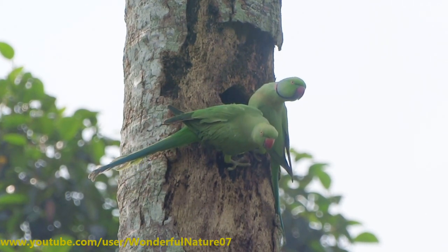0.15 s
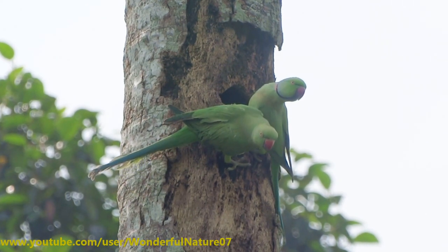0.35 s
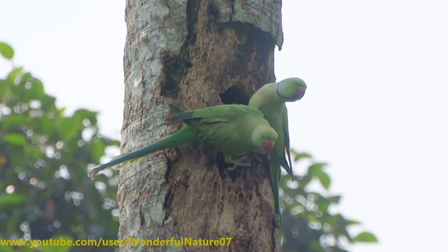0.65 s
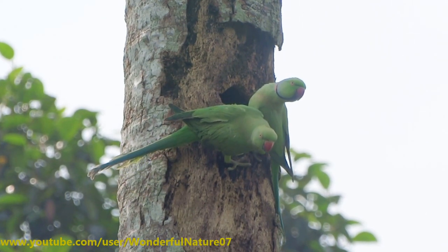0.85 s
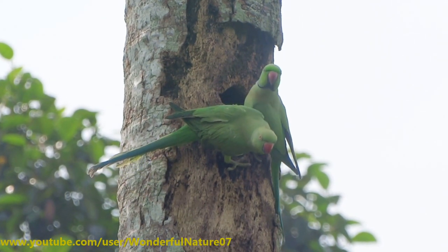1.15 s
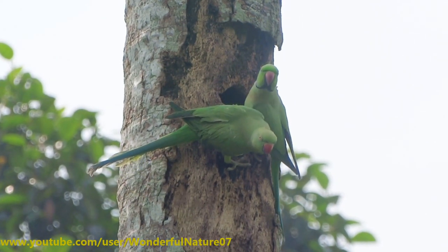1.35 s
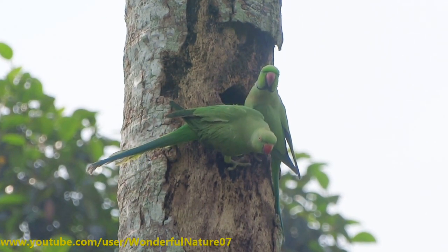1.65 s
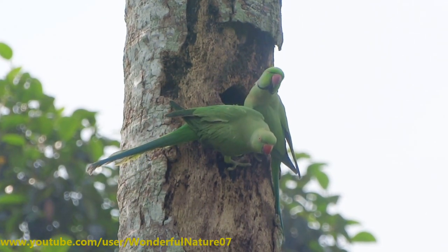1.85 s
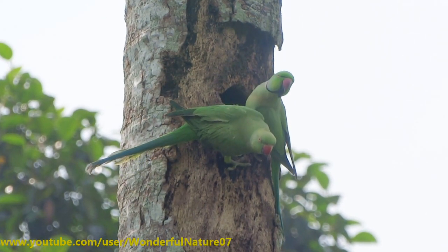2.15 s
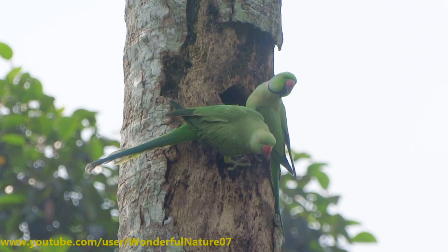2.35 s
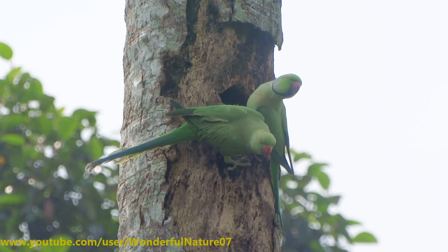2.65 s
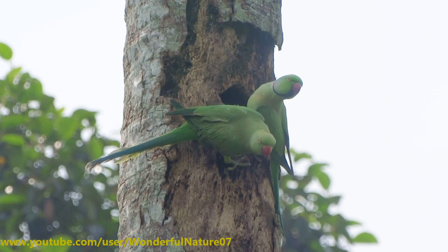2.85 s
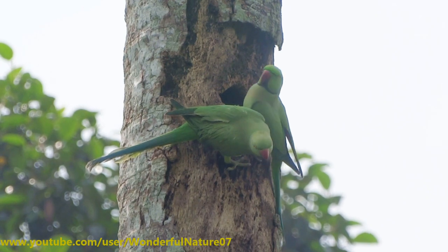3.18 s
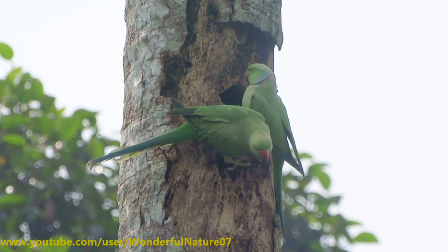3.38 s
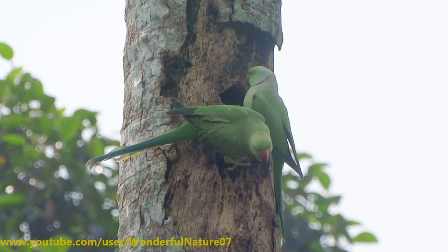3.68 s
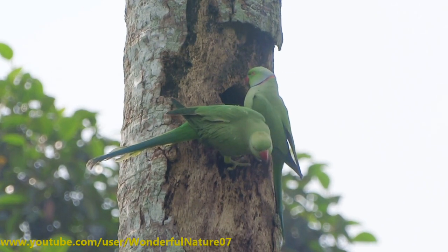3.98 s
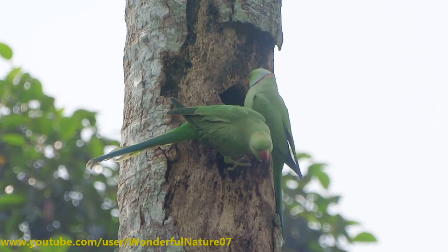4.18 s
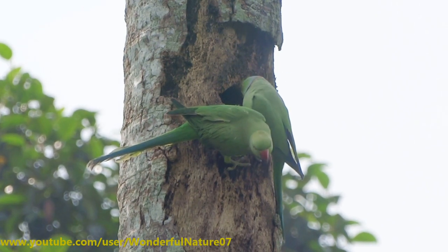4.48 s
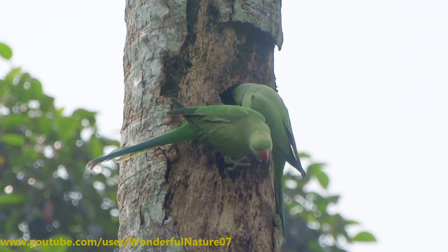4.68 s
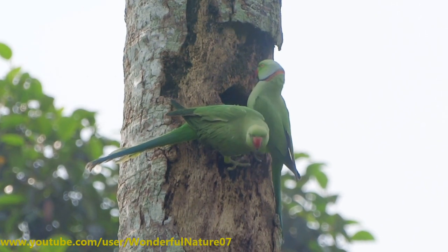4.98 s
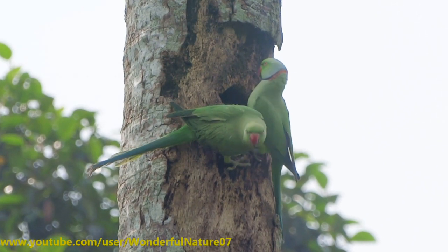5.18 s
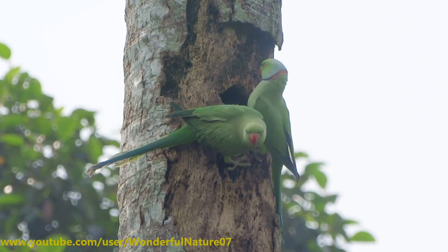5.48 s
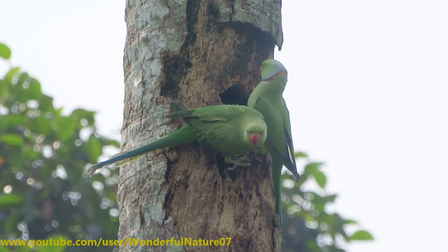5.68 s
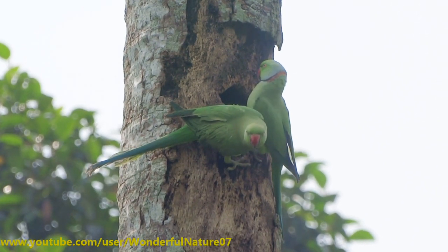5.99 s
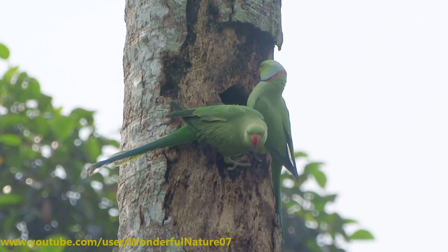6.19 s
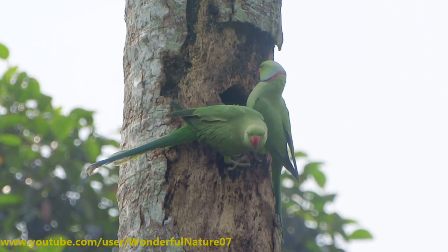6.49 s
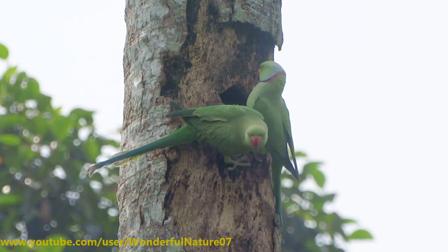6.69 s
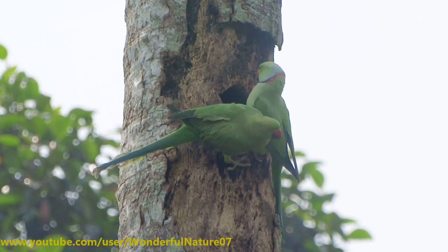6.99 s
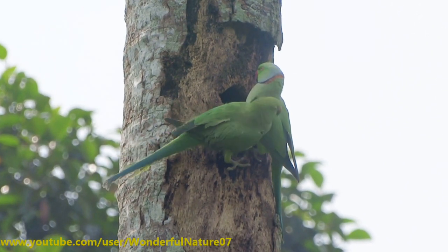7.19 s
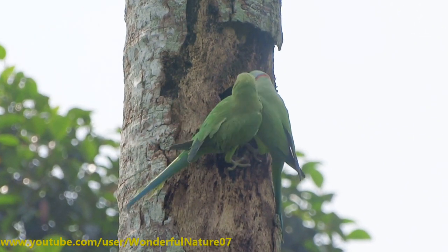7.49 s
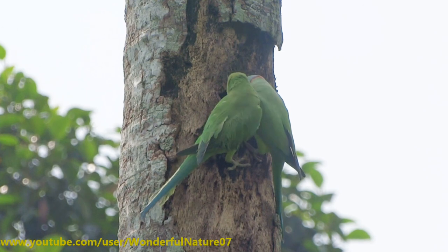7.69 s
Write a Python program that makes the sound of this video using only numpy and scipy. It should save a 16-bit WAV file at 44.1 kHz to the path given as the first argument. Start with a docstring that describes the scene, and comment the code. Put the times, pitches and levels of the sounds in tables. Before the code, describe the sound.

Outdoor woodland birdsong heard from a fixed spot. Distant hollow trills come first, then one louder, closer bird repeats a fast descending roll five times, alternating with blurred answers. Sharp high chips, sliding whistles and brief buzzy falling calls come between. Quiet airy hiss, shimmering high insects, a barely audible dove purr and a remote slow engine lie beneath. The final second gets busier with clear whistles.

```python
"""A humid forest edge, heard in stereo: a barbet close by rolls five-note trills, nearly dry; others answer
from farther off, blurred by echo. Small birds chip and whistle among the trunks: pitch curves drive sines, and
each call gets a fresh noise tail. A dove purrs and a slow engine thumps in the distance: clicks ring resonances.
Cicadas and crickets drone as pulsed narrow bands of noise, over shaped noise for the murmur and the leaves."""
import sys
import numpy as np
from scipy import signal
from scipy.fft import rfft, irfft, next_fast_len
from scipy.io import wavfile
from scipy.ndimage import uniform_filter1d, map_coordinates

SR = 44100
rng = np.random.default_rng(int(sys.argv[2]) if len(sys.argv) > 2 else 0)


def store_pcm(level_fs):
    """Save levels as 16-bit WAV."""
    pcm = np.round(np.clip(level_fs, -1, 1) * 32767).astype(np.int16)
    wavfile.write(sys.argv[1], SR, np.atleast_2d(pcm).T)


N = 345744

# one hooked barbet note, before the trill reshapes it: time_s, pitch_hz, level_db
HOOKED_NOTE = [(-.008, 1276, -14), (-.003, 1286, -9.5), (.002, 1331, -1), (.0065, 1255, -3),
               (0.0104, 1175, 0.24), (.017, 1105, -8), (.024, 1096, -9), (0.03, 1170, -19)]


def amp(db):
    """Gain of a level in dB."""
    return 10 ** (np.asarray(db) / 20)


def unit(x):
    """x at rms 1."""
    return x / np.sqrt(np.mean(x ** 2) + 1e-20)


def along(points, hz):
    """Reads (Hz, value) points on a log frequency axis."""
    f, v = np.transpose(points)
    return np.interp(np.log(hz + 1), np.log(f + 1), v)


def curves(rows, start=0, size=N):
    """One value per sample for each column after the time."""
    s, *cols = np.transpose(rows)
    t = start + np.arange(size) / SR
    return [np.interp(t, s, c) for c in cols]


def wobble(rate, size=N):
    """A smooth random curve, rate knots a second."""
    knots = rng.standard_normal(int(size * rate / SR) + 4)
    return map_coordinates(knots, [np.arange(size) * rate / SR])


def filtered(x, response):
    """x times a complex response of frequency."""
    m = next_fast_len(N + SR // 2)
    return irfft(rfft(x, m) * response(np.fft.rfftfreq(m, 1 / SR)), m)[..., :N]


def peak(f, hz, width):
    """Response of a causal resonance."""
    return 1j * f * width / (hz * hz - f * f + 1j * f * width)


def pair(a, b, alike):
    """Left and right from two unrelated signals with the given likeness."""
    turn = np.arccos(np.clip(alike, -1, 1)) / 2
    middle, side = np.cos(turn) * a, np.sin(turn) * b
    return np.array([middle + side, middle - side])


def beats(rate, scatter_db):
    """One click each time the running rate completes a cycle."""
    at = np.flatnonzero(np.diff(np.floor(np.cumsum(rate) / SR)))
    clicks = np.zeros(N)
    clicks[at] = amp(scatter_db * wobble(30)[at])
    return clicks


def bouts(rows, fade):
    """Gain that opens for each (start_s, length_s, level_db), fading in and out."""
    t = np.arange(N) / SR
    gain = 0
    for s, length, db in rows:
        to_edge = np.minimum(t - s, s + length - t)
        gain = gain + amp(db) * np.clip(to_edge / fade + .5, 0, 1)
    return gain


def dove():
    """A purr: about 28 puffs a second ring a hollow throat."""
    # purrs: start_s, length_s, level_db
    purrs = [(-.1, 0.68, -60), (2.9, 1.55, -60), (5.2, 1.14, -61), (7.1, 1, -63)]
    puffs = beats(28.0 * (1 + .03 * wobble(7.3)), scatter_db=2.0)
    purr = filtered(puffs, lambda f: peak(f, 456.0, 69.5) ** 2)
    return bouts(purrs, fade=0.11) * amp(0.85 * wobble(3.97)) * unit(purr)


def hiss(spectrum, patchy_db):
    """Stereo noise of rms 1 with faint patches in time and pitch, shaped by a spectrum."""
    # left-right likeness of the air: freq_hz, likeness
    air_likeness = [(60, 0.97), (150, 0.95), (380, 0.58), (950, 0.57), (2380, 0.76), (5980, 1), (15000, 1)]
    z = signal.stft(rng.standard_normal((2, N)), nperseg=512)[2]
    patches = uniform_filter1d(rng.standard_normal(z.shape[1:]), size=6, axis=0)
    patches = uniform_filter1d(patches, size=14, axis=1)
    hz = np.fft.rfftfreq(512, 1 / SR)[:, None]
    patchy = pair(*z, along(air_likeness, hz)) * amp(patchy_db * unit(patches))
    stereo = signal.istft(patchy, nperseg=512)[1][:, :N]
    return unit(filtered(stereo, lambda f: amp(along(spectrum, f))))


def air():
    """A low murmur from afar and the hiss of leaves, each noise under its own slow level curve."""
    # spectrum of the forest's murmur: freq_hz, relative_db
    murmur_spectrum = [(15, -59), (25, -9), (157, -7), (201, -6), (261, -4.5), (462, -7), (539, -3.5),
                       (1000, -9), (1300, -63), (2200, -120)]
    # spectrum of the leaves: freq_hz, relative_db
    leaf_spectrum = [(700, -43), (1100, 3.5), (1700, -1.5), (2400, -7.5), (4200, -4), (5000, -5.5),
                     (7200, -2), (9200, -5.5), (10000, -11.5), (12700, -13), (13600, -21.5), (15800, -17)]
    # the breeze: time_s, murmur_db, leaves_db
    breeze = [(0, -61, -55), (1.0, -60.5, -56), (1.6, -60.5, -53), (4, -56.5, -53.5), (5.2, -57.5, -52),
              (6.4, -58, -52), (7.84, -59.5, -50.5)]
    murmur_db, leaves_db = curves(breeze)
    murmur = amp(murmur_db) * hiss(murmur_spectrum, patchy_db=2.0)
    leaves = amp(leaves_db + 1.64 * wobble(8)) * hiss(leaf_spectrum, patchy_db=2.5)
    return murmur + leaves


def engine():
    """A single slow cylinder thumps through its exhaust; distance narrows each resonance."""
    # level of the thumping: time_s, level_db
    thump_level = [(0.0, -66), (0.13, -56), (0.24, -65.5), (3.25, -63), (3.41, -57), (4.5, -68),
                   (4.56, -60.5), (7.73, -63.5), (7.84, -65)]
    # exhaust resonances, alternating in sign: freq_hz, width_hz, gain_db
    exhaust = [(93, 37, -2.5), (150.4, 30, -1.5)]

    def pipe(f):
        return sum((-1) ** k * amp(g) * peak(f, hz, w) ** 2 for k, (hz, w, g) in enumerate(exhaust))

    db, = curves(thump_level)
    firings = beats(17.5 * (1 + 0.0292 * wobble(2.8)), scatter_db=2.5)  # about 17.5 a second
    return amp(db) * unit(filtered(firings, pipe))


def choir(hz, width, rate, depth):
    """A narrow band of noise whose centre drifts, in puffs at its buzz rate."""
    buzz_phase = 2 * np.pi * np.cumsum(rate * (1 + .006 * wobble(3))) / SR
    buzz = np.exp(2 * depth * np.cos(buzz_phase))
    slow = filtered(rng.standard_normal((4, N)), lambda f: 1 / (1 + (2 * f / width) ** 2))
    turn = 2 * np.pi * np.cumsum(hz * (1 + .003 * wobble(1.2))) / SR
    band = slow[:2] * np.cos(turn) + slow[2:] * np.sin(turn)  # slow noise moved up to the centre pitch
    return amp(.8 * wobble(6)) * unit(pair(*band, .992) * buzz)


def cicadas():
    """Two choirs of pulsed noise bands swell, each on its own level curve."""
    # swells: time_s, low_choir_db, high_choir_db
    swells = [(0.0, -57.5, -59.5), (0.7, -51, -51), (0.89, -60, -55), (1.22, -55, -59), (2.27, -56.5, -58),
              (2.9, -52.5, -51.5), (3.45, -53.5, -55.5), (4.13, -58.5, -56), (4.76, -54.5, -56),
              (5.28, -50, -52), (5.76, -57, -55), (6.38, -53.5, -53), (7.03, -51.5, -59.5),
              (7.38, -53.5, -50.5), (7.84, -56, -55)]
    # bands, the first being the low choir: centre_hz, width_hz, pulses_per_s, pulse_depth, db_over_swell
    bands = [(7930, 460, 45, 0, 0), (8344, 160, 160, 0.2, -2), (8630, 310, 78, 0.43, -7),
             (11930, 470, 70, 0.3, -15)]
    low_db, high_db = curves(swells)
    drone = 0
    for k, (*voice, db) in enumerate(bands):
        swell_db = high_db if k else low_db
        drone = drone + amp(swell_db + db + 1.8 * wobble(2.2)) * choir(*voice)
    return drone


def crickets():
    """Pulsed noise bands open in regular bouts."""
    # centre_hz, width_hz, pulses_per_s, pulse_depth, level_db, first_bout_s, period_s, bout_s
    singers = [(10730, 370, 55, 0.24, -67.5, -0.51, 1.35, 0.66),
               (11230, 140, 70, .1, -68, 0.15, 1.24, 0.48)]
    song = 0
    for *voice, db, first, period, bout in singers:
        rows = [(s, bout, db) for s in np.arange(first, N / SR, period)]
        song = song + bouts(rows, fade=.12) * choir(*voice)
    return song


def add_call(out, s, call, echo_db, pan_db=0):
    """Lays a call into out with the answer of the trunks, a new decaying noise tail for each call."""
    # decay of the echoes: freq_hz, t60_s
    forest_decay = [(500, 1.7), (1200, 1.21), (3000, .7), (7000, 0.56), (14000, 0.37)]
    # left-right likeness of the echoes: freq_hz, likeness
    echo_likeness = [(500, 0.46), (1200, 0.92), (3000, 0.88), (6000, 1)]
    hz, t, z = signal.stft(rng.standard_normal((2, SR)), SR, nperseg=256)
    z = pair(*z, along(echo_likeness, hz)[:, None]) * amp(-60 * t / along(forest_decay, hz)[:, None])
    z /= np.sqrt(np.sum(abs(z[0]) ** 2, axis=1, keepdims=True))  # equal energy at every pitch
    tail = signal.istft(z, SR, nperseg=256)[1]
    path = amp(echo_db) * tail / np.linalg.norm(tail[0])
    path[:, 0] = 1  # the direct sound
    pan = amp([[pan_db / 2], [-pan_db / 2]])  # pan_db is left over right
    heard = signal.fftconvolve(call[None], path, axes=1) * pan
    spot = out[:, round(s * SR):][:, :heard.shape[1]]
    spot += heard[:, :spot.shape[1]]


def sung(hz, db):
    """A sine on a pitch curve."""
    return amp(db) * np.sin(2 * np.pi * np.cumsum(hz) / SR)


def whistle(length, hz0, hz1, bend, warble_hz):
    """A tone that slides toward its end pitch, shaken by an uneven warble."""
    u = np.arange(round(length * SR)) / (length * SR)
    glide = hz0 + (hz1 - hz0) * np.expm1(-bend * u) / np.expm1(-bend)
    warble = warble_hz * wobble(120, size=len(u))
    return np.sin(np.pi * u) ** .45 * sung(glide + warble, 0)


def gliding_whistles(out):
    """Glides among the trunks, some alone, some the opening or one half of a longer call."""
    # start_s, length_s, from_hz, to_hz, bend, warble_hz, level_db
    glides = [(.04, .27, 1850, 1480, 1.02, 75, -58), (.753, .008, 5400, 8600, .3, 30, -46),
              (1.228, .097, 1500, 1440, 1.8, 17, -45.5), (1.97, .065, 2900, 3050, 2.5, 20, -59),
              (3.30, .07, 2150, 1950, 1.1, 60, -62), (6.30, .05, 4000, 3300, 1.1, 90, -55),
              (6.37, .06, 3100, 2500, 1.1, 180, -54), (6.41, .135, 3950, 2050, 1.3, 60, -52.5),
              (6.67, .09, 2430, 2720, .5, 15, -60), (6.915, .12, 3450, 2830, 1.8, 15, -57),
              (7.60, .08, 1330, 1620, -1.5, 60, -49), (7.655, .05, 3250, 3820, 1.5, 50, -53),
              (7.665, .21, 1660, 1370, .4, 35, -36.5), (7.70, .09, 2850, 1750, .6, 130, -47)]
    for s, *glide, db in glides:
        add_call(out, s, amp(db) * whistle(*glide), echo_db=0, pan_db=-2.2)


def template(rows):
    """Pitch and level of a short call, corners rounded, both ends faded out."""
    size = round((rows[-1][0] - rows[0][0]) * SR)
    hz, db = (uniform_filter1d(c, size=90) for c in curves(rows, rows[0][0], size))
    return hz, db + 20 * np.log10(signal.windows.tukey(size, .3) + 1e-4)


def trill(times, pitch, db, swell_db, partials=()):
    """Falling notes in a row, swelling from a soft first one and growing shallower, each a little different."""
    pivot_hz = 1340  # before the pitch factor
    hz, shape_db = template(HOOKED_NOTE)
    row = np.zeros(round(times[-1] * SR) + 2 * len(hz))
    for k, at in enumerate(times):
        # the swell's deficit shrinks to .44 at each note, while each note tires by .75 dB
        level = db - swell_db * .44 ** k - .75 * k + rng.normal(0, 0.38)
        slide = pivot_hz + (1.04 - .075 * k) * (hz - pivot_hz)
        note = sung(slide * pitch * rng.normal(1, 0.0065), shape_db)
        row[round(at * SR):][:len(hz)] += amp(level) * note
        for start, length, hz0, hz1, part_db in partials:
            tone = whistle(length, hz0, hz1, bend=.5, warble_hz=35 + hz0 / 170)
            part_gain = amp(level + part_db + rng.normal(0, 3))
            row[round((at + start - HOOKED_NOTE[0][0]) * SR):][:len(tone)] += part_gain * tone
    return row


def far_barbets(out):
    """Pure five-note trills from farther off, blurred: the fainter a trill, the wetter."""
    # start_s, note_gap_s, pitch_factor, level_db (before the swell)
    far_trills = [(.372, 0.04, 0.97, -39), (.76, .034, .93, -43), (1.539, 0.035, 0.96, -28),
                  (1.92, .038, .95, -35), (2.25, 0.032, 0.91, -42), (2.81, 0.04, .98, -26),
                  (3.46, 0.033, .99, -49), (4.099, 0.043, 0.97, -30.5), (4.6, .039, .99, -72),
                  (5.38, 0.044, 0.98, -28.5), (5.83, 0.04, .99, -46), (6.733, 0.043, 0.99, -29.5),
                  (7.079, 0.042, 0.98, -41.5)]
    for s, gap, pitch, db in far_trills:
        echo_db = -1 + 0.2741 * (-28.5 - db)
        call = trill(gap * np.arange(5), pitch, db, swell_db=8.5)
        add_call(out, s + HOOKED_NOTE[0][0], call, echo_db, pan_db=-1.4)


def rising_babble(out):
    """A far bird climbs under a strong uneven warble, its echo louder than the direct tone."""
    # start_s, length_s, level_db
    climbs = [(0.416, 0.32, -54.5), (1.08, 0.52, -56.5), (6.861, 0.3, -53.5)]
    for s, length, db in climbs:
        climb = whistle(length, 1360, 1940, bend=1.2, warble_hz=175)
        add_call(out, s, amp(db) * climb, echo_db=8, pan_db=-2.2)


def chips(out):
    """Chips of one hooked shape, with parallel lines from a second oscillator."""
    # shape of a chip: time_s, pitch_hz, level_db
    chip_shape = [(0, 5715, 11), (.005, 6810, -4), (.010, 7644, 5), (.016, 6890, 0.5), (.026, 6146, 1.5),
                  (.040, 5950, -21.5), (.052, 6200, -30)]
    # parallel lines: offset_hz, gain_db
    chip_lines = [(-3950, -15), (10, 0.5), (3950, -16.5), (7900, -22)]
    # start_s, pitch_factor, level_db (before the shape's), echo_db
    chip_calls = [(0.756, 0.95, -41, 1), (1.805, 0.94, -49, 12), (2.152, 0.96, -51, 12),
                  (2.621, .99, -51, 8), (4.306, 0.95, -40, -0.5)]
    hz, shape_db = template(chip_shape)
    for s, pitch, db, echo_db in chip_calls:
        call = sum(sung(pitch * hz + shift, db + shape_db + line_db) for shift, line_db in chip_lines)
        add_call(out, s, call, echo_db)


def ticks(out):
    """Dry twigs or beaks: bare cracks of fast-decaying noise, their top smoothed off."""
    # start_s, level_db (before smoothing)
    cracks = [(0.8713, -28), (2.296, -25), (6.601, -31), (7.3703, -43)]
    t = np.arange(SR // 100) / SR
    for s, db in cracks:
        crack = amp(db - 60 * t / 0.0033) * np.diff(rng.standard_normal(len(t) + 1))
        crack = uniform_filter1d(uniform_filter1d(crack, size=3), size=3)
        add_call(out, s, crack, echo_db=-10)


def near_barbet(out):
    """The close bird, bright and nearly dry: five-note trills with thin, slightly hoarse partials."""
    # start_s, rush_s (gained per note squared), pitch_factor, level_db (before the swell)
    near_trills = [(1.3443, .0001, .995, -12.3), (2.579, .0007, .995, -11), (3.796, .0006, 1.0, -11.5),
                   (5.0123, .0009, 1.01, -11.5), (6.1678, .0003, .972, -12.7)]
    # partials of each note: start_s, length_s, from_hz, to_hz, db_over_note
    hoarse_partials = [(.001, 0.017, 689, 610, -39.5), (-.004, 0.026, 1794, 1530, -40),
                       (-.004, 0.021, 2543, 2763, -32), (.010, 0.0248, 2303, 2072, -32.5),
                       (-.004, 0.021, 5394, 5020, -33.5), (-.003, 0.01865, 6400, 6680, -36.5),
                       (-.003, 0.017, 9330, 8820, -39), (-.003, 0.023, 10450, 10400, -43),
                       (-.003, .022, 13050, 12900, -43), (-.003, .024, 14350, 14400, -45),
                       (-.003, .022, 15700, 15600, -49)]
    later = np.arange(4)
    for s, rush, pitch, db in near_trills:
        times = [0, *(.030 + .0408 * later - rush * later ** 2)]  # s; the first gap is the shorter
        call = trill(times, pitch, db, swell_db=13.5, partials=hoarse_partials)
        add_call(out, s + HOOKED_NOTE[0][0], call, echo_db=-9, pan_db=-1.05)


def two_part_calls(out):
    """A pulsed buzz opens each call and a clear fall ends it."""
    # start_s, pitch_factor, level_db (of the fall)
    coos = [(3.185, 1.01, -41.5), (3.799, 1.0, -42), (4.444, .98, -41)]
    for s, pitch, db in coos:
        buzz = whistle(.1, *np.multiply(pitch, (1625, 1560)), bend=-1.5, warble_hz=12)
        pulses = np.exp(1.5 * np.cos(2 * np.pi * 105 * np.arange(len(buzz)) / SR))  # 105 Hz
        add_call(out, s, amp(db - 11) * (buzz * pulses), echo_db=1, pan_db=-2.2)
        fall = whistle(.125, *np.multiply(pitch, (1600, 1350)), bend=.6, warble_hz=20)
        add_call(out, s + .045, amp(db) * fall, echo_db=-1, pan_db=-2.2)


def hooked_cries(out):
    """Cries that drop fast and then hold, with a fainter octave, loudest at the start."""
    # start_s, length_s, level_db (at the start)
    cries = [(7.322, .22, -49.5), (7.63, .08, -40), (7.70, .15, -42)]
    slide_s = .036  # time constant of the drop
    for s, length, db in cries:
        cry = 0
        for k, gain_db in ((1, 0), (2, -17)):
            cry = cry + amp(gain_db) * whistle(length, k * 4000, k * 2720, length / slide_s, warble_hz=45)
        fading = amp(db - np.linspace(0, 6, len(cry)))
        add_call(out, s, fading * cry, echo_db=-.6, pan_db=-2.2)


def scene():
    """Birds among the trees over the steady background."""
    background = dove() * amp([[-1.5], [1.5]]) + air() + engine() + cicadas() + crickets()
    birds = np.zeros((2, N))
    gliding_whistles(birds)
    far_barbets(birds)
    rising_babble(birds)
    chips(birds)
    ticks(birds)
    near_barbet(birds)
    two_part_calls(birds)
    hooked_cries(birds)
    return birds + background


def record(dry):
    """The camera keeps nothing above its band limit of 15850 Hz."""
    return filtered(dry, lambda hz: hz < 15850)


dry = scene()
out = record(dry)
store_pcm(out)
```